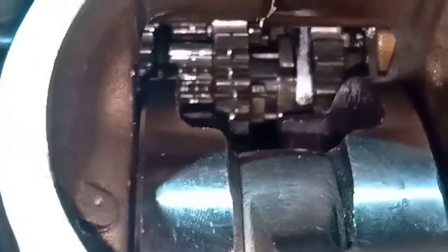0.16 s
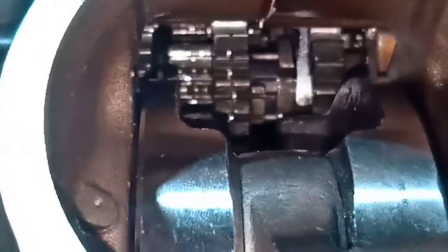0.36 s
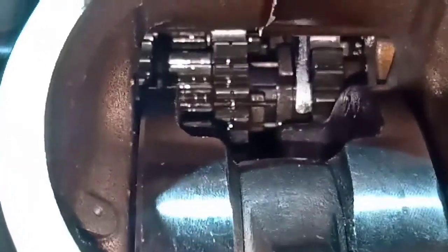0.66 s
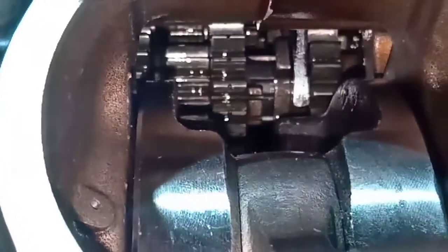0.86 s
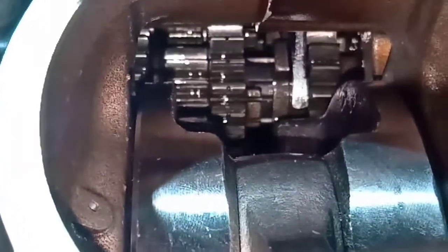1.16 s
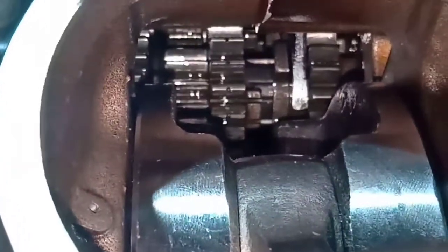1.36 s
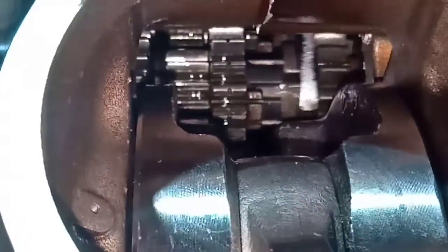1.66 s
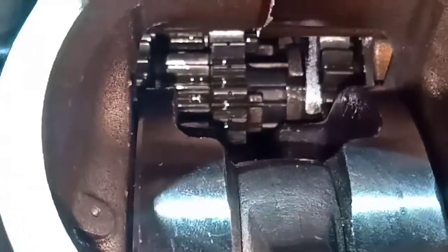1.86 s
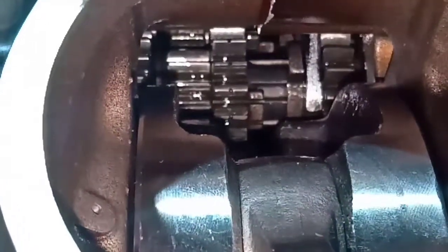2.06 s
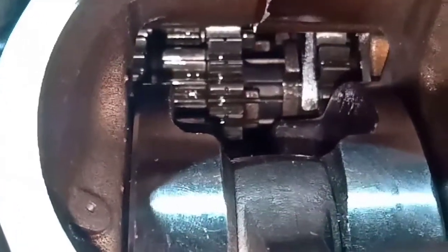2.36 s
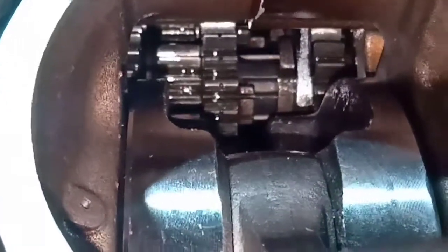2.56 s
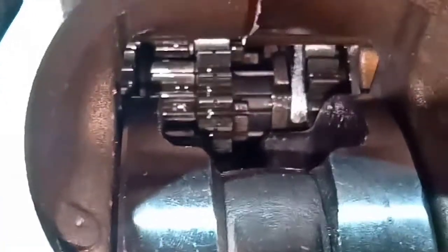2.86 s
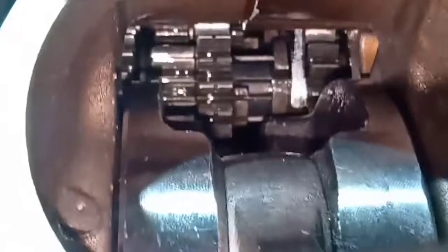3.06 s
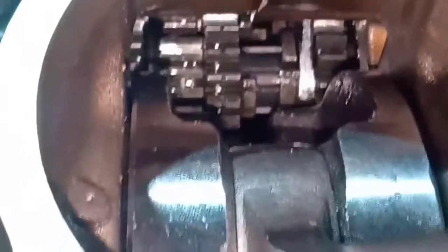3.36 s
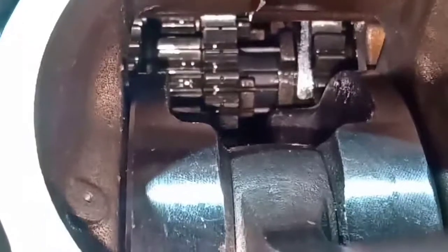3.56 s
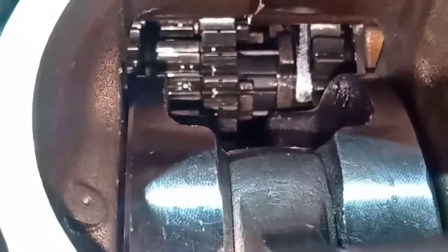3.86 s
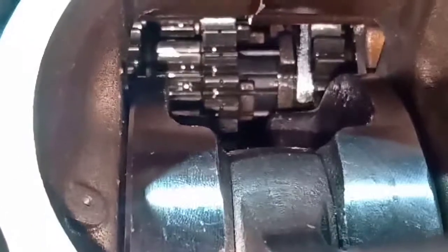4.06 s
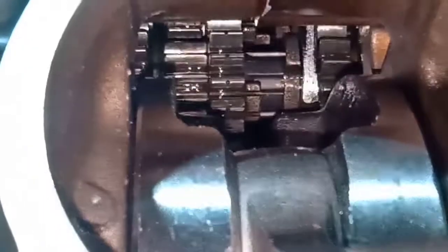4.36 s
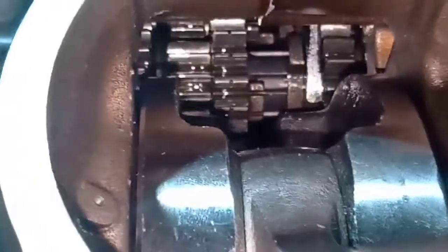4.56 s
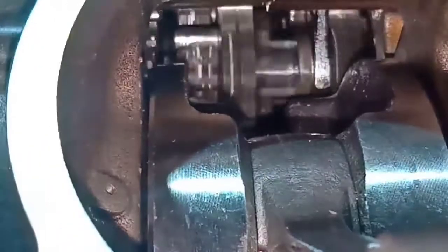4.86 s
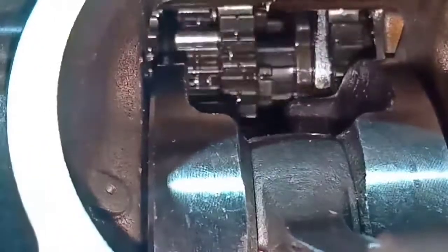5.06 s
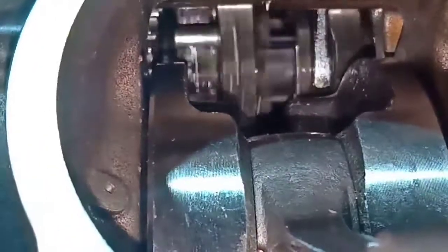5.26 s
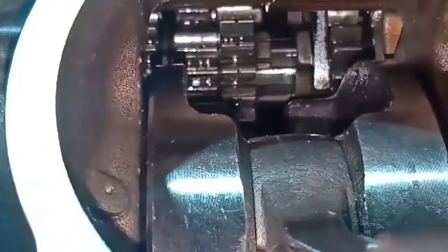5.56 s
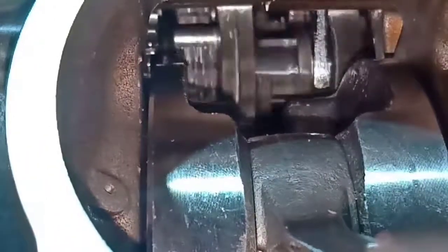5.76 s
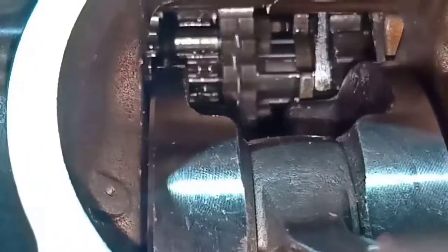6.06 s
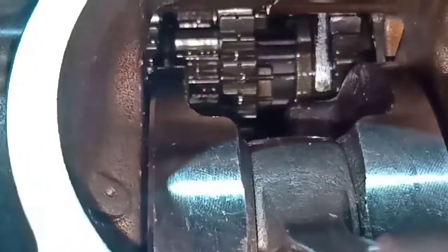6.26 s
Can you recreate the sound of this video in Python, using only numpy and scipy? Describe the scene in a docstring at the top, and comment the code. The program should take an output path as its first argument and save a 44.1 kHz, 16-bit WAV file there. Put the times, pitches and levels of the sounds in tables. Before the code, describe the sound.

Oily steel gears and a shift fork click and slide inside a metal case, very close to a small microphone. Two loud, low-mid hollow clunks dominate, one early and one late, each short and solid with a brief case ring. Between them are sparse sharp ticks, small knocks and light scrapes. The ending is quieter: a turning shaft swishes rhythmically and squeaks faintly in a short room reverberation.

```python
"""Clunks, clicks and sliding steel: an opened motorcycle gearbox worked by hand on a bench, close to a microphone.
Twice the shift drum snaps over and the gears slam home, ringing the cast case; around this, dog teeth
ratchet, click and slide. At the end the shaft is spun: it clicks, swishes and squeaks faintly as it turns.
Noise bursts (contact) and steady noise (friction) drive damped resonances of each part; blows and a spring
add decaying modes. A small workshop reverberates, over steady room noise."""
import sys
import numpy as np
from scipy import signal
from scipy.fft import rfft, irfft
from scipy.io import wavfile
from scipy.ndimage import uniform_filter1d

SR = 44100
rng = np.random.default_rng(int(sys.argv[2]) if len(sys.argv) > 2 else 0)


def generate_wav(signal):
    """Clip the signal to [-1, 1] and save it as 16-bit WAV at the path in sys.argv[1]."""
    frames = np.transpose(np.atleast_2d(signal))
    scaled = np.clip(frames, -1, 1) * 32767
    pcm = np.round(scaled).astype(np.int16)
    wavfile.write(sys.argv[1], SR, pcm)


N = 282542
TIME = np.arange(N) / SR


def amp(db):
    """Level law: decibels to amplitude gain."""
    return 10 ** (np.asarray(db) / 20)


def rms_one(x, count=None):
    """Power normalisation: the first count samples (or all) get rms 1."""
    return x / np.sqrt(np.mean(x[:count] ** 2) + 1e-20)


def at_hz(points, hz):
    """Interpolation of a table on a log-frequency axis."""
    f, value = np.transpose(points)
    return np.interp(np.log(np.maximum(hz, 1)), np.log(f), value)


def add(out, s, x):
    """Superposition: mix x into out from time s on."""
    i = int(s * SR)
    out[i:i + len(x)] += x[:N - i]


def band(x, low_hz, high_hz, order=2):
    """Causal band-pass filtering."""
    sos = signal.butter(order, [low_hz, min(high_hz, .45 * SR)], "band", fs=SR, output="sos")
    return signal.sosfilt(sos, x)


def resonate(x, resonances):
    """Parallel damped resonance: the width sets the decay, and the signs alternate."""
    out = 0
    for k, (hz, width, db) in enumerate(resonances):
        r = np.exp(-np.pi * width / SR)
        zeros = [(1 - r * r) / 2, 0, (r * r - 1) / 2]
        poles = [1, -2 * r * np.cos(2 * np.pi * hz / SR), r * r]
        out = out + (-1) ** k * amp(db) * signal.lfilter(zeros, poles, x)
    return out


# Oil-damped resonances of the case, the fork, a gear and the tooth edges.
# Each row: frequency in Hz, width in Hz, relative level in dB.
CASE_RESONANCES = [(240, 190, -8), (374, 140, 0.5), (539.5, 140, 0), (770, 170, -0.5), (996, 260, -6.5)]
FORK_RESONANCES = [(1059, 180, -4), (1347, 130, -2), (1494, 150, 0.5), (1976, 280, -3)]
GEAR_RESONANCES = [(2280, 180, -5), (2594, 145, 2.5), (3105, 220, -2.5), (3646, 260, -8.5),
                   (4083, 200, -13)]
TOOTH_RESONANCES = [(4880, 420, -2.5), (6040, 300, 0.5), (7014, 380, 3), (8130, 400, -1.5),
                    (9100, 500, -5.5), (11400, 470, -6.5), (13600, 480, -11.5), (15200, 290, -13.5)]


def part(x, resonances, skirt=1.34):
    """Resonant radiation: a part sounds through its resonances and falls away outside them."""
    return band(resonate(x, resonances), resonances[0][0] / skirt, resonances[-1][0] * skirt)


def tilted(resonances, slope_db):
    """Spectral tilt: lean resonances brighter or duller, in dB per octave above the first."""
    return [(hz, width, db + slope_db * np.log2(hz / resonances[0][0])) for hz, width, db in resonances]


def ring(modes, scatter_db=-0.2):
    """Modal decay: a blow leaves free modes ringing, their strengths and phases varying each time."""
    t = TIME[:SR // 2]
    hz, db, t60 = np.transpose(modes)[:, :, None]
    t60 = np.clip(t60, .03, .4)
    strength = amp(db + scatter_db * rng.standard_normal(hz.shape))
    phase_turns = rng.random(hz.shape)
    decaying_modes = strength * amp(-60 * t / t60) * np.sin(2 * np.pi * (hz * t + phase_turns))
    return np.sum(decaying_modes, axis=0)


def contact(rise_s, chatter_db, chatter_s):
    """Rough contact: steel faces meet in a brief swelling rush of noise, then dying chatter."""
    t = TIME[:SR // 8]
    rush = (t / rise_s * np.exp(1 - t / rise_s)) ** 2
    chatter = amp(chatter_db) * np.exp(-t / chatter_s) * (1 - np.exp(-t / rise_s))
    return rng.standard_normal(len(t)) * (rush + chatter)


def swell(start, peak, end, curve=1.33):
    """Amplitude envelope: a push grows and fades."""
    return np.interp(TIME, [start, peak, end], [0, 1, 0]) ** curve


# Spectrum of the steady background. Each row: frequency in Hz, relative density in dB per Hz.
AIR_SPECTRUM = [(24, -28), (45, -16), (91, -4), (297, -9.5), (600, -10.5), (831, -12.5), (1300, -16),
                (2100, -16.5), (3000, -21), (4200, -32), (5600, -37.5), (7360, -32), (9800, -39),
                (11400, -38), (12400, -44), (13500, -40.5), (16000, -43)]
AIR_DB = -62.5


def air():
    """Stationary noise: the room's steady noise and hiss, shaped in frequency."""
    hz = np.arange(N // 2 + 1) * SR / N
    spectrum = rfft(rng.standard_normal(N)) * amp(at_hz(AIR_SPECTRUM, hz))
    return amp(AIR_DB) * rms_one(irfft(spectrum, N))


# Decay of the workshop. Each row: frequency in Hz, t60 in seconds.
WORKSHOP_T60 = [(100, 0.36), (400, 0.22), (1000, 0.2), (3000, 0.13), (8000, 0.5), (15000, 0.2)]
# Strength of its reflections. Each row: frequency in Hz, reverberation against direct sound in dB.
WORKSHOP_DB = [(100, -8.5), (400, -7), (1000, -8.5), (3000, -12.5), (6000, -16), (15000, -16)]


def workshop(x, build_s=0.005):
    """Diffuse reverberation: reflections build up quickly and die at their own rate in each octave."""
    t, response = TIME[:SR // 2], 0
    edges = np.geomspace(60, 16000, 9)
    for low, high in zip(edges, edges[1:]):
        hz = np.sqrt(low * high)
        t60 = np.clip(at_hz(WORKSHOP_T60, hz), .08, .5)
        envelope = amp(-60 * t / t60) * (1 - np.exp(-t / build_s))
        tail = band(rng.standard_normal(len(t)), low, high) * envelope
        # each band's energy is in proportion to its width
        share = np.sqrt(2 * (high - low) / SR / len(t))
        response = response + amp(at_hz(WORKSHOP_DB, hz)) * rms_one(tail) * share
    return signal.fftconvolve(x, response)[:N]


# The gearbox is nudged on its bench. Each row: start in seconds, level in dB.
NUDGES = [(0.645, -49.5), (0.675, -47.5), (0.812, -48), (0.916, -40.5), (0.965, -33), (1.148, -42.5),
          (1.301, -49), (1.395, -46.5), (1.824, -43.5), (2.649, -45.5), (2.733, -49.5), (3.074, -47),
          (3.168, -48), (4.264, -38), (4.52, -49), (4.591, -42)]
# Low resonances of the whole gearbox. Each row: frequency in Hz, width in Hz, relative level in dB.
RUMBLE_RESONANCES = [(103, 24, 1), (169, 79, -1), (250, 320, -5.5)]
BUMP_HZ, BUMP_SCATTER = 106, 0.092   # median, and spread of its natural logarithm
SHUDDER_DB, SHUDDER_T60_S = -5, 0.28   # against the level of the nudge


def bumps(t60=0.1, rise_s=0.0022):
    """Rigid-body oscillation: the whole gearbox rocks for a few cycles and shudders to rest."""
    out, t = np.zeros(N), TIME[:SR // 4]
    for s, db in NUDGES:
        hz = BUMP_HZ * np.exp(BUMP_SCATTER * rng.standard_normal())
        rock = np.sqrt(2) * amp(-60 * t / t60) * np.sin(2 * np.pi * hz * t)
        rumble = rms_one(part(rng.standard_normal(len(t)), RUMBLE_RESONANCES))
        shudder = amp(SHUDDER_DB - 60 * t / SHUDDER_T60_S) * rumble
        add(out, s, amp(db) * (1 - np.exp(-t / rise_s)) * (rock + shudder))
    return out


# The fork glides along its rod. Its one row: start in seconds, peak in seconds, end in seconds.
FORK_GLIDE = (2.14, 2.186, 2.51)
GLIDE_HISS_DB, GLIDE_TICK_DB, GLIDE_TICKS_PER_S = -71.5, -63.5, 41


def glide(tilt_db=4, uneven_db=3):
    """Light sliding friction: a fine hiss with tiny bright ticks at uneven intervals."""
    start, peak, end = FORK_GLIDE
    ticks = np.zeros(N)
    for s in np.arange(start, end, 1 / GLIDE_TICKS_PER_S):
        tick = rms_one(part(contact(0.0012, -6.0, .005), tilted(TOOTH_RESONANCES, tilt_db)), count=353)
        late_s = rng.random() / GLIDE_TICKS_PER_S
        add(ticks, s + late_s, amp(GLIDE_TICK_DB + uneven_db * rng.standard_normal()) * tick)
    hiss = amp(GLIDE_HISS_DB) * rms_one(part(rng.standard_normal(N), TOOTH_RESONANCES))
    return swell(start, peak, end, curve=0.94) * (hiss + ticks)


# The turning shaft squeaks. Each row: start in seconds, length in seconds, level in dB.
SQUEAK_TIMES = [(5.163, 0.066, -75), (5.265, .042, -85), (5.533, 0.056, -78.5), (5.951, 0.074, -83),
                (6.352, 0.054, -75)]
# Narrow resonances of the squeak. Each row: frequency in Hz, width in Hz, relative level in dB.
SQUEAK_RESONANCES = [(3470, 63, -2.5), (6100, 100, -1), (9177, 280, -11.5)]


def squeaks(fade_s=0.016):
    """Narrow-band resonance: noise from a rubbing spot on the shaft sings in narrow resonances."""
    level = 0
    for s, length, db in SQUEAK_TIMES:
        edge_distance_s = np.minimum(TIME - s, s + length - TIME)
        level = level + amp(db) * np.clip(edge_distance_s / fade_s, 0, 1)
    return level * rms_one(part(rng.standard_normal(N), SQUEAK_RESONANCES))


# A spring is plucked. Each row: start in seconds, level in dB.
PLUCKS = [(1.863, -60), (1.876, -56), (1.921, -64.5)]
# Free modes of the spring. Each row: frequency in Hz, relative level in dB, t60 in seconds.
SPRING_RING = [(1834, -7, 0.38), (2860, -6, 0.23), (5000, -8, 0.27), (6651, -5, 0.22), (7600, 1, .2),
               (8380, -2, 0.13), (7940, 4, 0.1), (8400, -10, .12), (10124, -5, 0.13), (10340, -10, 0.14)]


def spring(buzz_db=-6):
    """Modal ringing with contact noise: a thin, high ring; the coils buzz against their seat as it dies."""
    out = np.zeros(N)
    for s, db in PLUCKS:
        add(out, s, amp(db) * rms_one(ring(SPRING_RING), count=880))
        buzz = part(contact(.001, -8, 0.051), tilted(TOOTH_RESONANCES, -32))
        add(out, s, amp(db + buzz_db) * rms_one(buzz, count=880))
    return out


SPIN_S, TURN_S = 4.975, 0.401   # first swish, time per turn


def turns():
    """Periodic rotation: the moments at which the freely spinning shaft comes round."""
    return SPIN_S + TURN_S * np.arange(4)


def friction(grains_per_s, spread_db, smooth, judder_db, judder_s):
    """Granular friction: tiny catches of uneven size on top of smooth rubbing; the pressure judders."""
    sizes = amp(spread_db * np.minimum(rng.exponential(1, N), 4)) * rng.choice([-1, 1], N)
    catches = rms_one(sizes * (rng.random(N) < grains_per_s / SR))
    force = catches + smooth * rng.standard_normal(N)
    pressure = rms_one(uniform_filter1d(rng.standard_normal(N), int(judder_s * SR)))
    return force * amp(judder_db * pressure)


# Parts slide or shudder on their shafts. Each row: start in seconds, peak in seconds, end in seconds,
# case level in dB, steel rasp level in dB, place from 0 on the fork to 1 on a gear.
PUSHES = [(0.906, 0.945, 1.08, -39.5, -75, .5), (1.104, 1.158, 1.31, -46, -73, 0.43),
          (1.271, 1.342, 1.41, -51, -75, .7), (1.6, 1.73, 2.7, -67.5, -66, .8),
          (1.763, 1.88, 2.04, -73, -61, 0.54), (2.48, 2.666, 2.83, -68.5, -67, 0.78),
          (2.8, 2.86, 3, -57, -63, 0.28), (2.943, 2.997, 3.14, -71.5, -61, 0.44),
          (3.231, 3.335, 3.48, -54, -67, .6), (3.392, 3.401, 3.673, -49, -66, 0.32),
          (3.625, 3.84, 4.19, -51, -59, 0.47), (4.497, 4.526, 4.69, -48, -58.5, 0.45),
          (4.704, 4.731, 4.77, -37, -44.5, 0.019), (4.76, 4.814, 4.88, -45.5, -54.5, 0.051)]
SWISH_RISE_S, SWISH_FALL_S, SWISH_CASE_DB, SWISH_RASP_DB, SWISH_PLACE = 0.096, 0.11, -62, -64, 0.63
# a usual slide's case level and its rumble, and the share of the case's swing that the rumble follows
USUAL_SLIDE_DB, RUMBLE_DB, RUMBLE_FOLLOWS = -49, -54.5, 0.68
# tooth hiss against the rasp; it gains this share of the rasp's lead over the case
HISS_DB, HISS_FOLLOWS = -8.5, 0.17


def slides():
    """Friction-driven resonance: pushes by hand and each turn's swish excite the parts of the gearbox."""
    force = friction(900, 2.8, 0.74, judder_db=1.9, judder_s=0.015)
    bodies = (RUMBLE_RESONANCES, CASE_RESONANCES, FORK_RESONANCES, GEAR_RESONANCES, TOOTH_RESONANCES)
    voices = np.array([rms_one(part(force, body)) for body in bodies])
    swishes = [(s - SWISH_RISE_S, s, s + SWISH_FALL_S, SWISH_CASE_DB, SWISH_RASP_DB, SWISH_PLACE)
               for s in turns()]
    out = np.zeros(N)
    for start, peak, end, case_db, rasp_db, place in PUSHES + swishes:
        gear_share = np.clip(place, 0, 1)
        rumble_db = min(case_db, RUMBLE_DB + RUMBLE_FOLLOWS * (case_db - USUAL_SLIDE_DB))
        hiss_db = rasp_db + HISS_DB + HISS_FOLLOWS * (rasp_db - case_db)
        shares = np.sqrt([1, 1, 1 - gear_share, gear_share, gear_share])
        gains = amp([rumble_db, case_db, rasp_db, rasp_db, hiss_db]) * shares
        out += swell(start, peak, end) * (gains @ voices)
    return out


# the case answers clicks more evenly than the steel: its level for a usual click on the fork,
# the share of the difference it follows, and how much more a gear passes to it
USUAL_CLICK_DB, CLICK_CASE_DB, CASE_FOLLOWS, GEAR_CASE_DB = -46, -55.5, .8, 1


def click(db, place, sharpness_db, rise_s, tilt_db, snap_share=.8, dulling_db=5, usual_rise_s=0.0012):
    """Impact excitation: one contact rings case, fork and gear; the tooth edge adds a shorter, bright snap."""
    # a slower contact favours the lower resonances
    lean_db = -dulling_db * np.log2(rise_s / usual_rise_s)
    gear_share = np.clip(place, 0, 1)
    case_db = CLICK_CASE_DB + CASE_FOLLOWS * (db - USUAL_CLICK_DB) + GEAR_CASE_DB * gear_share
    case = part(contact(rise_s, -7, 0.0097), CASE_RESONANCES)
    fork = part(contact(rise_s, -1.5, 0.0065), tilted(FORK_RESONANCES, lean_db))
    gear = part(contact(rise_s, -1, .0055), tilted(GEAR_RESONANCES, lean_db))
    snap = part(contact(snap_share * rise_s, 0.0, 0.0041), tilted(TOOTH_RESONANCES, tilt_db))
    sounds = [(amp(case_db), case),
              (amp(db) * np.sqrt(1 - gear_share), fork),
              (amp(db) * np.sqrt(gear_share), gear),
              (amp(db + sharpness_db), snap)]
    return sum(gain * rms_one(sound, count=353) for gain, sound in sounds)


# Dog teeth skip over each other before they engage. Each row: first tooth in seconds, end in seconds,
# seconds per tooth, level in dB, time at full strength in seconds, then fading in dB per second.
TOOTH_RUNS = [(1.158, 1.212, .0124, -42.5, 0.019, 618), (4.5177, 4.588, .0086, -48.5, .008, 139.5)]
TOOTH_PLACE, TOOTH_SHARPNESS_DB, TOOTH_RISE_S = .9, -11.5, 0.0007
TOOTH_TILT_DB = -23.5   # per octave


def ratchets(uneven_db=2.0, stumble_s=.0012):
    """Periodic impacts: teeth skip past, hard and evenly timed at first, then fading and stumbling."""
    out = np.zeros(N)
    for start, end, tooth_s, db, hold_s, fade_db_per_s in TOOTH_RUNS:
        for t in np.arange(0, end - start, tooth_s):
            late_s = stumble_s * rng.standard_normal() * (t > hold_s)
            level_db = db - fade_db_per_s * max(t - hold_s, 0) + uneven_db * rng.standard_normal()
            tooth = click(level_db, TOOTH_PLACE, TOOTH_SHARPNESS_DB, TOOTH_RISE_S, TOOTH_TILT_DB)
            add(out, start + t + late_s, tooth)
    return out


# Light contacts. Each row: start in seconds, level in dB, place from 0 on the fork to 1 on a gear,
# sharpness as snap against the ring in dB, rise of the contact in seconds.
CONTACTS = [(0.589, -54, 0.12, -16.5, 0.0055), (0.7743, -52.5, 0.32, -22, 0.0014),
            (0.932, -56.5, 0.37, -1, 0.0009), (0.9546, -50, 0.82, -1, 0.0018),
            (1.1354, -49, 0.87, -27, 0.0012), (1.3, -57.5, 0.62, -26, 0.0015),
            (1.335, -60, 0.65, -25, 0.0012), (1.362, -47, 0.83, -28.5, .002),
            (1.751, -37.5, 0.9, -7, 0.0004), (1.7703, -46.5, 0.97, -4, 0.00056),
            (1.826, -52, 0.86, -13, 0.0024), (2.5072, -52, 0.32, -17, .002),
            (2.545, -57.5, 0.2, 0.5, 0.0016), (2.6883, -47.5, 0.28, -28, .0012),
            (2.698, -38.5, 0.32, -17, 0.0015), (2.731, -47.5, 0.54, -11, 0.0047),
            (2.7986, -35, 0.22, -16.5, 0.0013), (2.837, -63, .5, 2, .0013), (2.855, -54.5, 0.3, 2, 0.0019),
            (2.9546, -54, 0.58, 2.5, 0.0026), (3.185, -64.5, 0.36, 0, 0.0022),
            (3.2093, -52, 0.94, -12.5, 0.0011), (3.288, -60, 0.22, -3, 0.0014),
            (3.2965, -45, 0.18, -2.5, 0.00086), (3.773, -46.5, 0.073, -26, 0.0025),
            (3.94, -54, 0.055, -19.5, 0.0019), (4.2588, -45.5, 0.74, -19, 0.0026),
            (4.591, -42.5, 0.76, -12.5, .0015), (4.864, -50, 0.046, -29, .0014),
            (5.3198, -44.5, 0.29, -36.5, 0.0029), (5.366, -51, .55, -11, 0.0047),
            (5.728, -53.5, 0.27, -22.5, 0.0027), (6.113, -48.5, 0.099, -29, 0.0047)]
# the snap's tilt in dB per octave: on the fork, its change on a gear, and its gain per dB of sharpness
SNAP_TILT_DB, GEAR_TILT_DB, TILT_PER_SHARPNESS = 12, -14, .6


def clicks():
    """Contact stiffness: sharp edges snap brighter, the heavy gears duller than the fork."""
    out = np.zeros(N)
    for s, db, place, sharpness_db, rise_s in CONTACTS:
        tilt_db = SNAP_TILT_DB + GEAR_TILT_DB * place + TILT_PER_SHARPNESS * sharpness_db
        add(out, s, click(db, place, sharpness_db, rise_s, tilt_db))
    return out


def thud(hz, width_hz, order=5):
    """Cascaded resonance: the case wall swells into a few big swings and stops."""
    swing = signal.unit_impulse(SR // 2)
    for _ in range(order):
        swing = resonate(swing, [(hz, width_hz, 0)])
    return rms_one(swing, count=176)


def dulled(modes, slope_db, corner_hz=700):
    """Impact hardness: the modes above a corner tilt by slope_db per octave, down for a soft blow."""
    return [(hz, db + slope_db * max(np.log2(hz / corner_hz), 0), t60) for hz, db, t60 in modes]


# Gears slam home, rebound or butt softly. Each row: start in seconds, case level in dB, steel clank level
# in dB, crack level in dB, thud frequency in Hz, width in Hz of each resonance in the thud's cascade,
# case ringing against the thud in dB.
BLOWS = [(0.9121, -19, -45.5, -56.5, 790, 413, -6), (0.964, -9.5, -23.5, -38, 678, 620, -9),
         (3.08, -45.5, -72.5, -83, 347, 680, -18.5), (3.1753, -44, -72, -89, 340, 670, -22),
         (4.6873, -9.5, -24, -43, 650, 683, -9.5), (4.7545, -26, -48, -76, 680, 689, -10)]
# Free modes of the cast case. Each row: frequency in Hz, relative level in dB, t60 in seconds.
CASE_RING = [(103, -26.5, 0.3), (152, -27, 0.2), (263, -16, 0.14), (316, -11, 0.15), (389.6, -6.5, 0.093),
             (484, -6.5, 0.19), (537, -2.5, 0.11), (577.4, -6, 0.13), (641, -5.5, 0.13), (703, -3, 0.2),
             (824, -5, 0.095), (923, -1.5, 0.082), (1010, -3, 0.048), (1060, -8.5, 0.13), (1329, -17, 0.1),
             (1402, -19, 0.097), (1550, -17, 0.11), (1697, -17.5, 0.065), (1823, -17, 0.1),
             (1870, -18.5, 0.13), (2063, -21.5, 0.14), (2450, -27, 0.14), (2833, -30, 0.12)]
# clank against thud of a hard blow, and dB per octave that the ring loses per dB below that
HARD_CLANK_DB, SOFT_DULLING = -17, 0.22


def clunks(ring_rise_s=0.0014):
    """Impact and modal decay: the case thuds and its modes ring on, the steel clanks and cracks."""
    out, t = np.zeros(N), TIME[:SR // 2]
    for s, case_db, clank_db, crack_db, thud_hz, thud_width_hz, ring_db in BLOWS:
        modes = dulled(CASE_RING, SOFT_DULLING * (clank_db - case_db - HARD_CLANK_DB))
        body = rms_one(ring(modes), count=880) * (1 - np.exp(-t / ring_rise_s))
        add(out, s, amp(case_db) * (thud(thud_hz, thud_width_hz) + amp(ring_db) * body))
        force = contact(0.0005, -12.5, 0.0092)
        fork = rms_one(part(force, FORK_RESONANCES))
        gear = rms_one(part(force, GEAR_RESONANCES))
        clank = fork + amp(-6.5) * gear
        add(out, s + .0006, amp(clank_db) * rms_one(clank, count=176))
        crack = part(contact(0.00098, -19, 0.015), TOOTH_RESONANCES)
        add(out, s + 0.0019, amp(crack_db) * rms_one(crack, count=176))
    return out


def scene(clunk_room_db=-4):
    """Direct and reverberant sound: the case wall faces the microphone, so the clunks are drier."""
    heavy = clunks()
    light = bumps() + glide() + squeaks() + spring() + slides() + ratchets() + clicks()
    reverberant = workshop(amp(clunk_room_db) * heavy + light)
    return (air() + reverberant + light + heavy)[None]


def record(dry):
    """Band limiting: the small microphone loses the deep bass; the top is cut steeply."""
    bass_cut = signal.butter(2, 50, "high", fs=SR, output="sos")
    top_cut = signal.ellip(10, .2, 70, 15900, fs=SR, output="sos")
    return signal.sosfilt(top_cut, signal.sosfilt(bass_cut, dry))


dry = scene()
out = record(dry)
generate_wav(out)
```